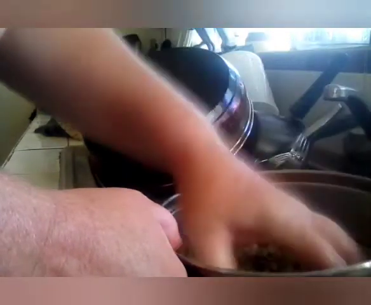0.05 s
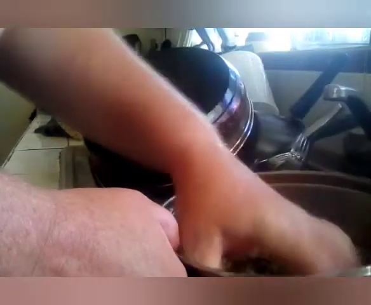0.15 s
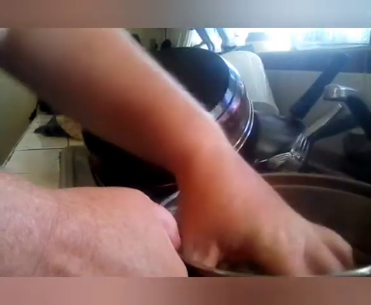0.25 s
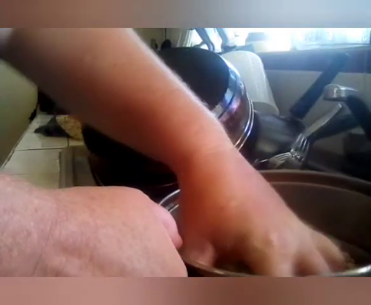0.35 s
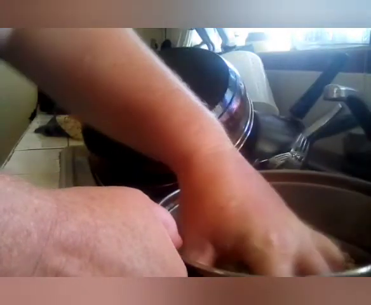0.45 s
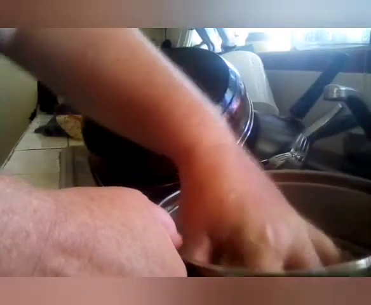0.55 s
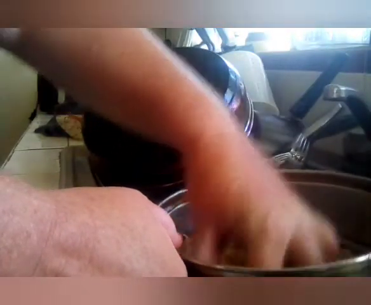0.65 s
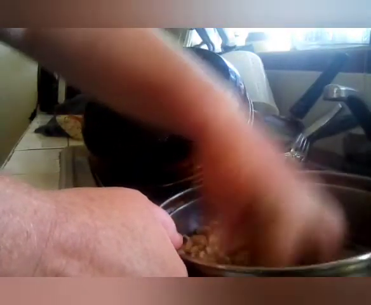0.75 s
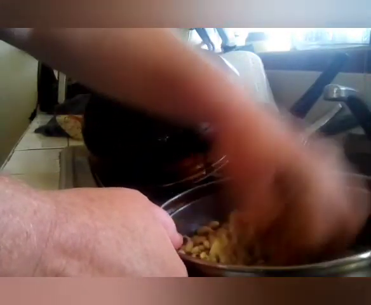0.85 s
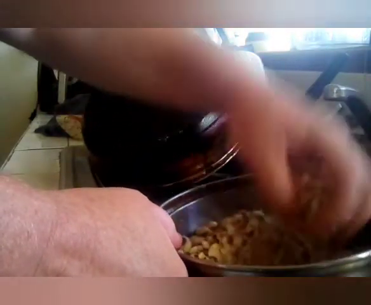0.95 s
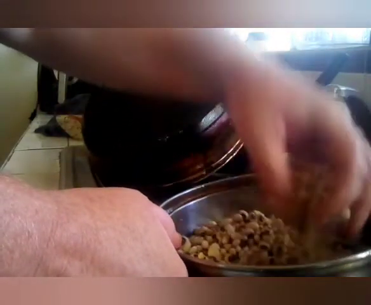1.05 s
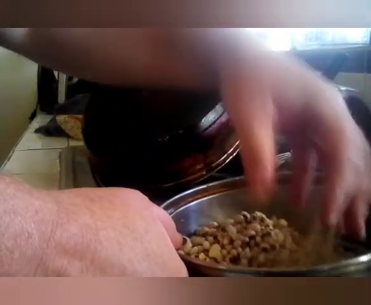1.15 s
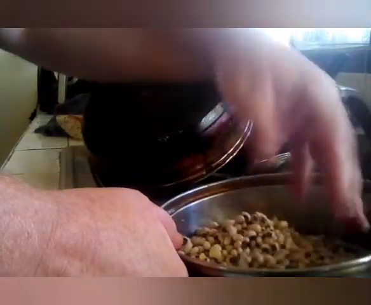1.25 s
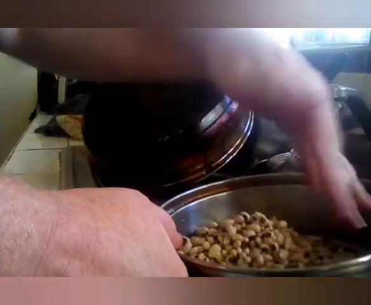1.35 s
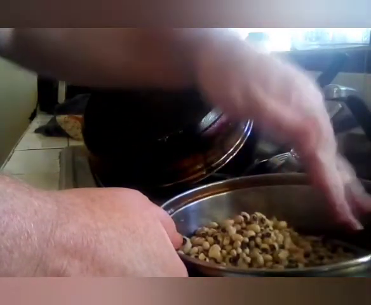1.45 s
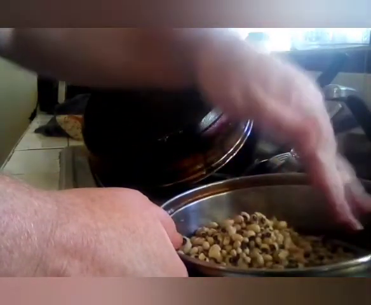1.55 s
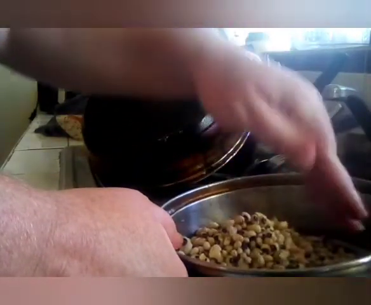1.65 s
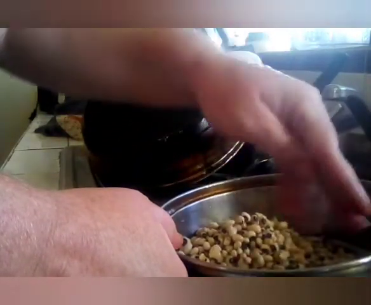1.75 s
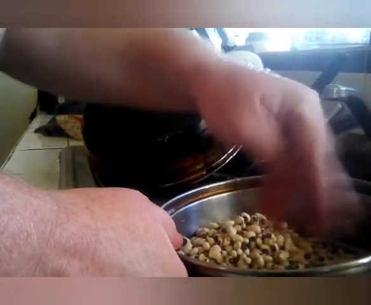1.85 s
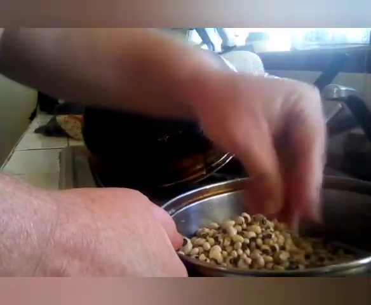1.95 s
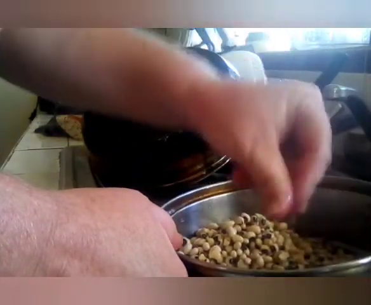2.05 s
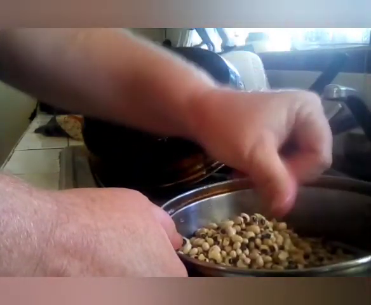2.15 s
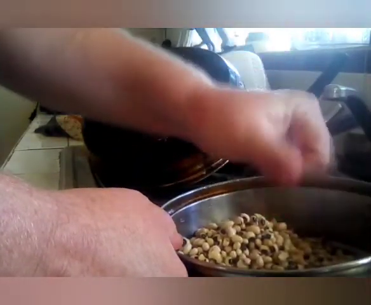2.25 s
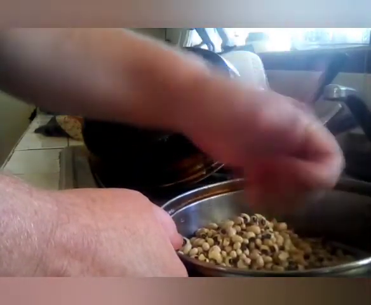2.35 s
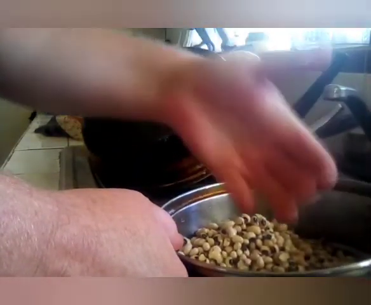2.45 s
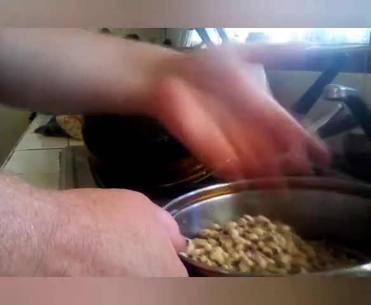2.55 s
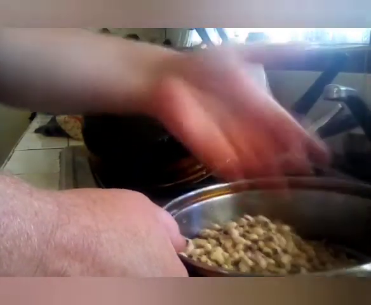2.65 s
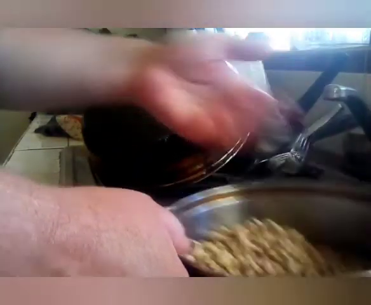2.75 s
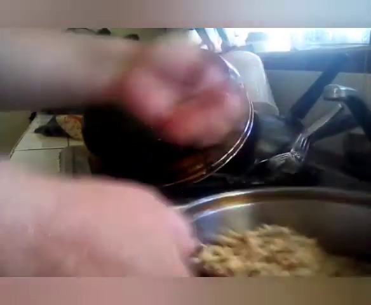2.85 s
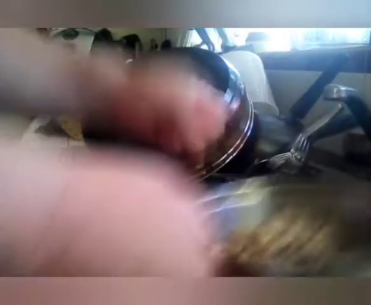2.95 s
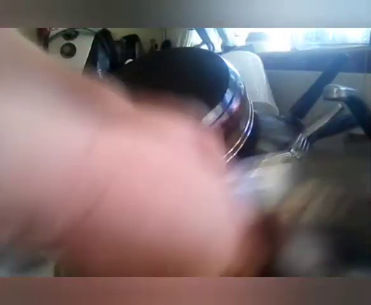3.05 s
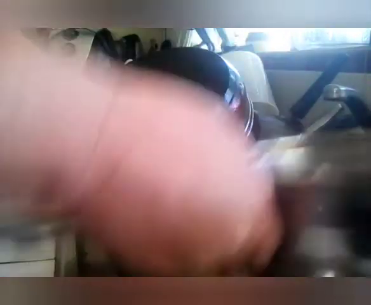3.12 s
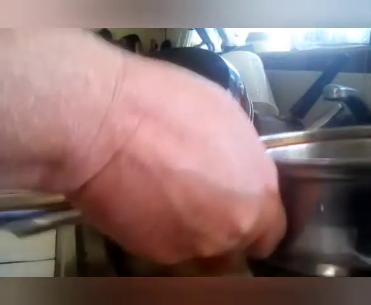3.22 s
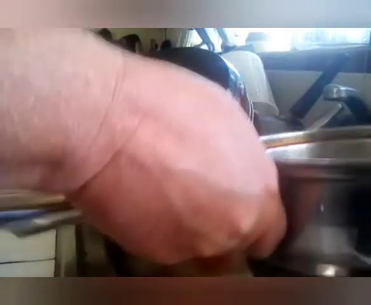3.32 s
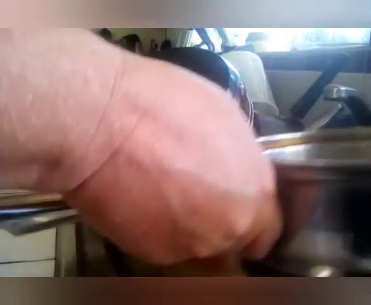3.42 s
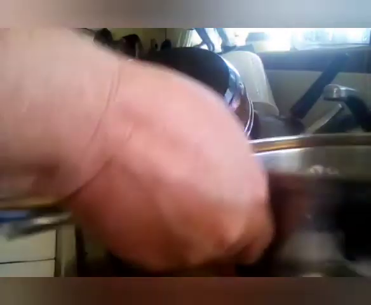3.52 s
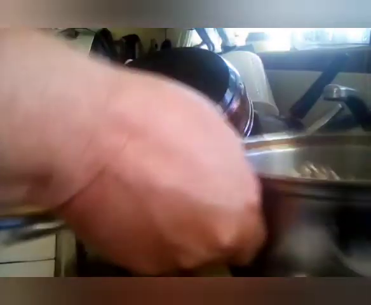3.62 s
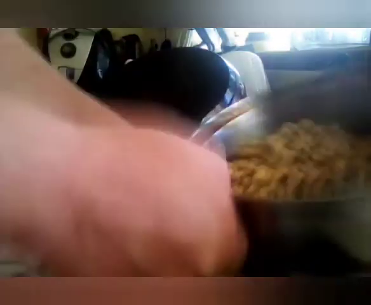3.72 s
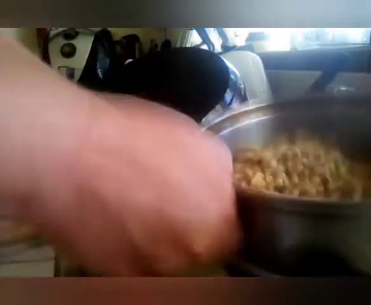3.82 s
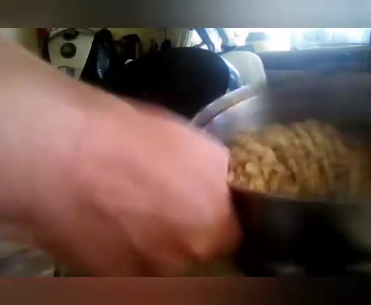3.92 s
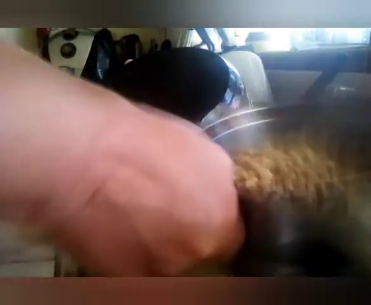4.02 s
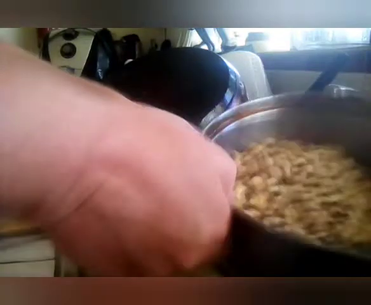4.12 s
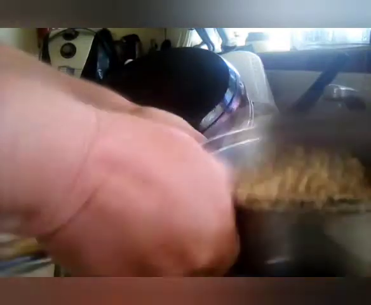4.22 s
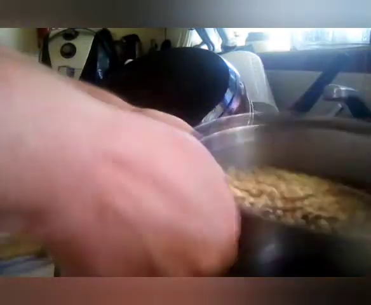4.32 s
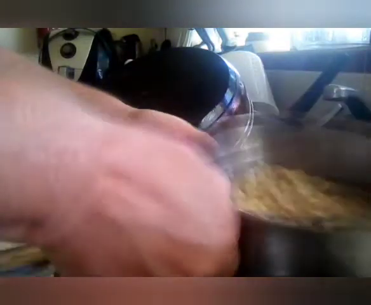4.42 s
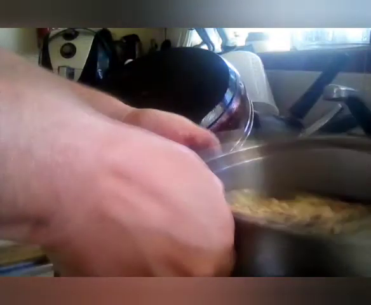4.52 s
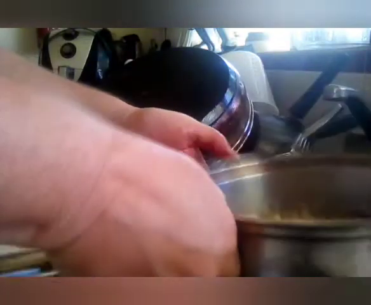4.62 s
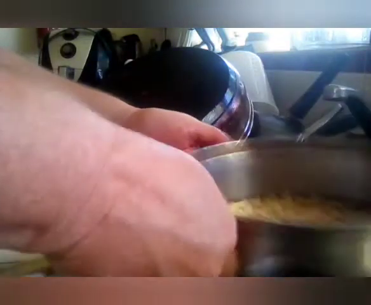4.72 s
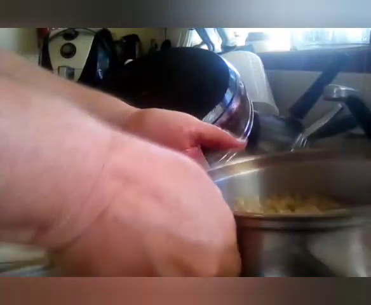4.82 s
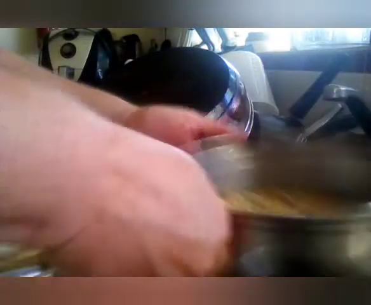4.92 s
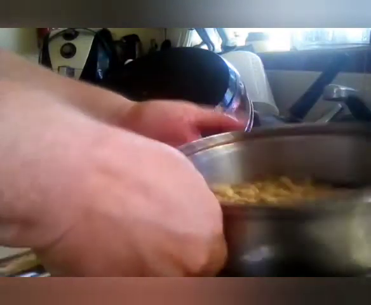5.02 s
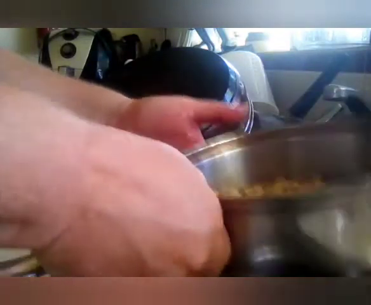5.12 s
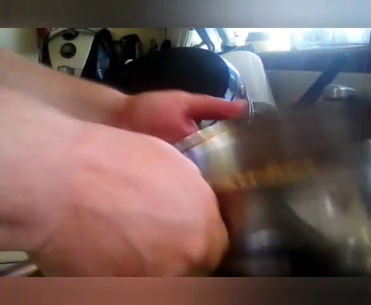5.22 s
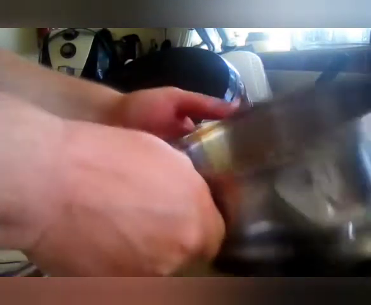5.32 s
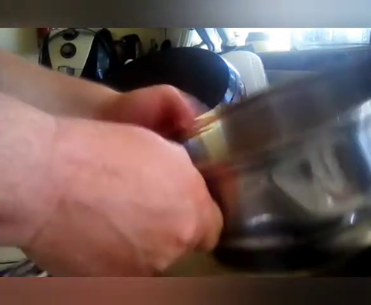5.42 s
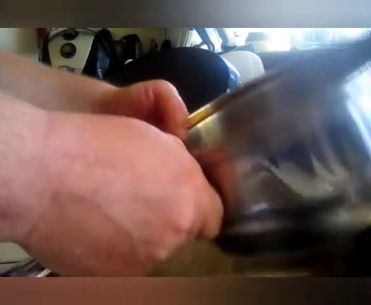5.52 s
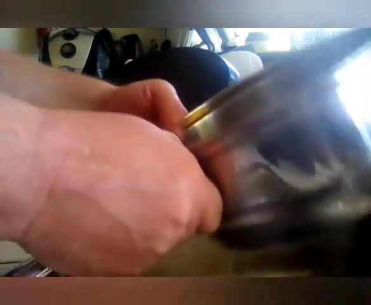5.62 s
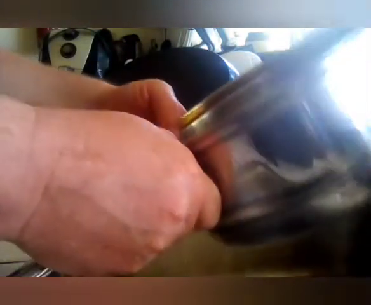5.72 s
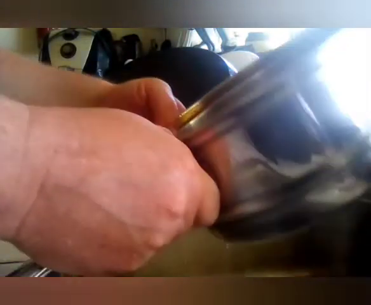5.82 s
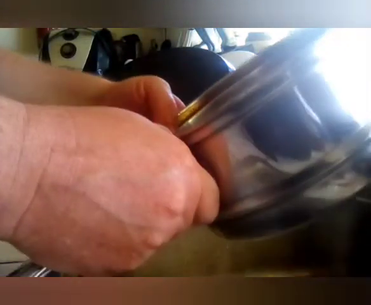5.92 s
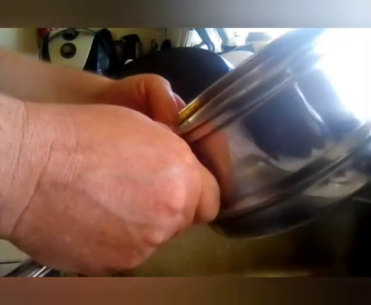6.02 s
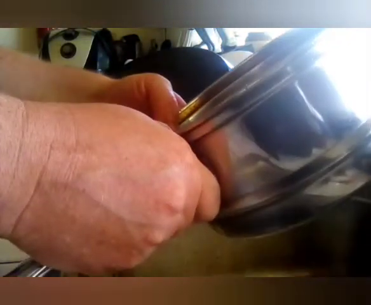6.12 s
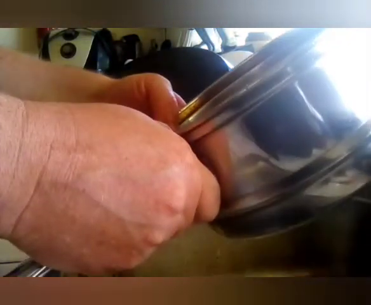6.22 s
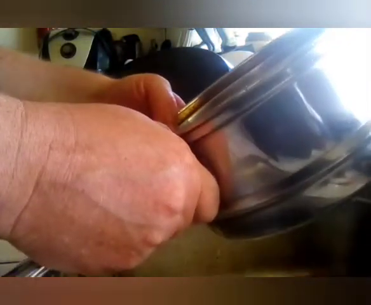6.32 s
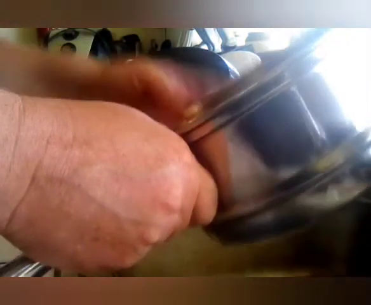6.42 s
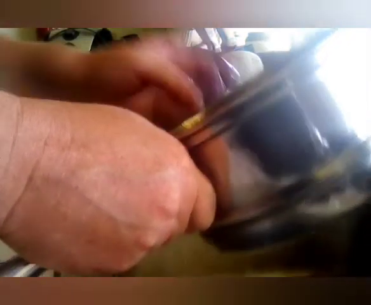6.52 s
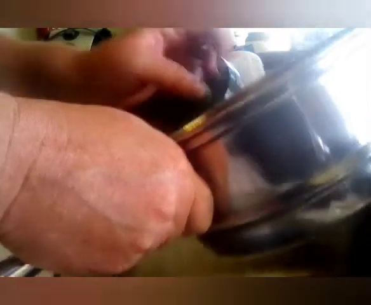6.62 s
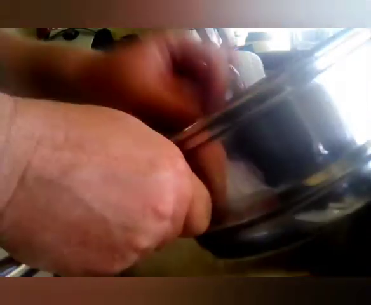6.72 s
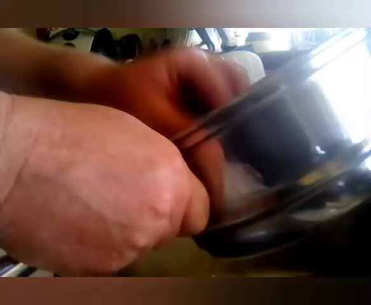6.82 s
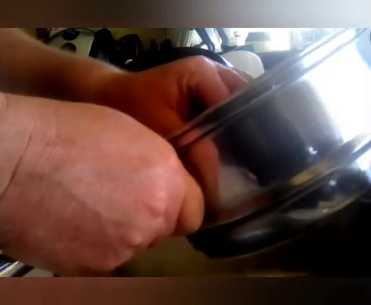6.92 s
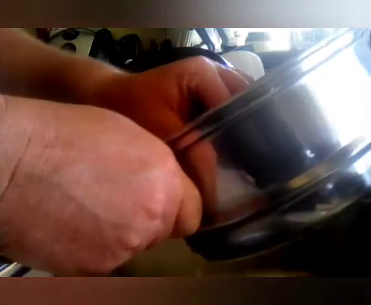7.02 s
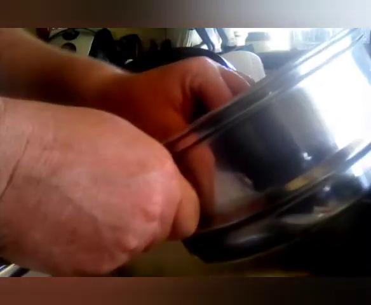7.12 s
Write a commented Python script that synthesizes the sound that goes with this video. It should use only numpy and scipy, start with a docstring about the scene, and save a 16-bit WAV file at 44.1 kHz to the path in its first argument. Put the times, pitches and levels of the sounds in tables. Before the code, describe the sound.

Wet beans are stirred by hand in a steel strainer, patter back dully, then clatter in bright tosses before slow drips knock a sink basin.

```python
"""Wet beans are stirred by hand in a steel strainer over a kitchen sink; a handful falls back with a dull patter.
The strainer is lifted and tossed so that the beans clatter on its wall, then tilted to drain:
drops knock on the basin while a dull wash of noise swells in the small room.
Every movement of the heap swells, holds and settles, and drives a stream of random bean contacts;
each contact excites a short crack of noise and the decaying resonances of the steel it meets."""
import sys
import numpy as np
from scipy import signal
from scipy.fft import rfft, irfft
from scipy.io import wavfile

SR = 44100
rng = np.random.default_rng(int(sys.argv[2]) if len(sys.argv) > 2 else 0)


def master_out(mix):
    """Clip the mix to full scale and print it as 16-bit PCM to the path in sys.argv[1]."""
    frames = np.transpose(np.atleast_2d(mix))
    ceiling = np.clip(frames, -1, 1)
    pcm = np.round(ceiling * 32767).astype(np.int16)
    wavfile.write(sys.argv[1], SR, pcm)


N = 316152
TIME = np.arange(N) / SR

# Dull contacts on the strainer bottom. Each row: frequency in Hz, relative level in dB.
THUD_SPECTRUM = [(30, -40.5), (100, -50), (200, -15.5), (330, 1), (430, -4), (700, 6), (1150, 1), (1550, 3),
                 (1800, -2.5), (2400, -5.5), (5000, -52)]
# Soft blows passed on to the sink. Each row: frequency in Hz, relative level in dB.
SINK_SPECTRUM = [(30, -43), (70, -39), (200, -11), (330, -5), (420, -4.5), (700, 0), (1000, 10.5),
                 (1400, -11.5), (1650, -8.5), (1950, -18.5), (2500, -17), (3200, -36), (8000, -100)]
# A touch on the rim. Each row: frequency in Hz, relative level in dB.
RIM_SPECTRUM = [(1500, -23), (2100, -18), (2450, 7), (2750, 0), (3200, -5), (4200, -10), (8000, -44)]
# Resonances of the rim. Each row: frequency in Hz, width in Hz, relative level in dB.
RIM_MODES = [(2450, 90, 1), (2320, 70, 0), (2720, 110, -3)]
# Resonances of the bare strainer. Each row: frequency in Hz, width in Hz, relative level in dB.
STRAINER_MODES = [(1910, 82, -5), (2240, 35, -3), (2910, 36, 5), (3320, 70, 0), (3870, 50, 7.5),
                  (4310, 60, -2), (4803, 32, 5), (5010, 34, 6.5), (5735, 48, 3), (6505, 38, 6),
                  (6820, 81, -4), (7600, 45, -14), (9000, 300, -16)]
# The bottom loaded with beans. Each row: frequency in Hz, width in Hz, relative level in dB.
LOADED_BOTTOM_MODES = [(308, 42, -13.5), (727, 24, 0), (1140, 98, -3.5), (1390, 8.3, -17), (1457, 68, -0.5)]
# The bottom pressed by the hand. Each row: frequency in Hz, width in Hz, relative level in dB.
PRESSED_BOTTOM_MODES = [(316, 20, -4), (345, 14, 3.5), (590, 18, -4), (706, 80, -1.5), (880, 60, 1.5),
                        (976, 28, -2.5), (1075, 52, 2.5), (1210, 90, -7.5), (1357, 55, 2), (1493, 36, -5.5)]


def from_db(db):
    """Decibels to gain."""
    return 10 ** (np.asarray(db) / 20)


def unit_energy(x):
    """Scale so that the squares sum to one."""
    return x / np.sqrt(np.sum(x ** 2) + 1e-20)


def add(out, s, sound):
    """Mix a sound in from time s on."""
    start = int(np.clip(round(s * SR), 0, N - 1))
    out[start:start + len(sound)] += sound[:N - start]


def colour(x, spectrum):
    """Causal (minimum-phase) filter of unit energy that follows the shape of a spectrum."""
    size = 4096
    hz, db = np.transpose(spectrum)
    grid = np.maximum(np.fft.rfftfreq(size, 1 / SR), 1)
    level_db = np.interp(np.log(grid), np.log(hz), db)
    # folding the cepstrum onto positive times gives the minimum phase
    cepstrum = irfft(np.log(from_db(level_db)))
    cepstrum[1:size // 2] *= 2
    cepstrum[size // 2 + 1:] = 0
    response = unit_energy(irfft(np.exp(rfft(cepstrum))))
    return signal.oaconvolve(x, response)[:len(x)]


def soften(x, hz):
    """A soft contact lasts longer and so carries no treble: a low-pass at hz."""
    return signal.sosfilt(signal.butter(4, hz, fs=SR, output="sos"), x)


def waver(rate):
    """Slow random wander of spread about one, without wild excursions; rate in changes per second."""
    knots = signal.resample_poly(rng.standard_normal(400), 8, 1)
    wander = np.interp(TIME * rate * 8, np.arange(len(knots)), knots)
    return 2 * np.tanh(wander / 1.6)


def swells(starts, holds, levels_db, rise, fall):
    """Gain of a series of movements: each rises to its level, holds and settles, at rates in dB per second."""
    power = np.zeros(N)
    for s, hold, db in zip(starts, holds, levels_db):
        near = slice(*np.searchsorted(TIME, [s - .5, s + 1]))
        below_db = np.maximum(rise * (s - TIME[near]), fall * (TIME[near] - s - hold))
        power[near] += from_db(db - np.maximum(below_db, 0)) ** 2
    return np.sqrt(power)


def contacts(per_s, spread_db):
    """Random contacts of rms 1; a positive spread makes a few large ones, a negative spread a few small ones."""
    at = np.flatnonzero(rng.random(N) < per_s / SR)
    sizes = rng.laplace(0, 1, N)[at]
    out = np.zeros(N)
    out[at] = np.sign(sizes) * from_db(spread_db * np.minimum(abs(sizes), 3))
    return np.sqrt(N) * unit_energy(out)


def volleys(times, levels_db, scatter, lead_db, count=12):
    """At each time one leading contact, then others straggling behind it by scatter seconds on average."""
    clicks = np.zeros(N)
    for s, db in zip(times, levels_db):
        delay = -scatter * np.log(1 - (np.arange(count) + rng.random(count)) / count)
        sizes = from_db(rng.normal(0, 3.5, count)) * rng.choice([-1, 1], count)
        delay[0], sizes[0] = 0, from_db(lead_db)
        at = np.clip(((s + delay) * SR).astype(int), 0, N - 1)
        np.add.at(clicks, at, from_db(db) * unit_energy(sizes))
    return clicks


def ringing(modes, uneven_db):
    """Decaying sines set off by one tap; their strengths and exact pitches depend on where it lands."""
    detune = .003  # share of the pitch: the shifting load detunes the steel from one blow to the next
    t = TIME[:SR // 4]
    hz, width, db = np.transpose(modes)[:, :, None]
    hz = hz * (1 + detune * rng.standard_normal(hz.shape))
    strength = width * from_db(db + uneven_db * rng.standard_normal(db.shape))
    strength = strength * rng.choice([-1, 1], db.shape)
    sines = np.exp(-np.pi * width * t) * np.sin(2 * np.pi * hz * t)
    return unit_energy(np.sum(strength * sines, axis=0))


def noise_crack(spectrum, t60):
    """A short dense burst of decaying noise; t60 in seconds, unit energy."""
    t = TIME[:SR // 4]
    return unit_energy(colour(rng.standard_normal(len(t)) * from_db(-60 * t / t60), spectrum))


def strike(clicks, spectrum, modes, ring_db, crack_t60, spot_db, count=8):
    """Clicks land on several spots of a body, each with its own short crack and its own mix of the modes."""
    out = np.zeros(N)
    first, last = np.flatnonzero(clicks)[[0, -1]]
    spot = rng.integers(0, count, N)
    for k in range(count):
        tint_db = spot_db * rng.standard_normal(len(spectrum))
        crack = noise_crack(np.array(spectrum) + np.outer(tint_db, [0, 1]), crack_t60)
        response = unit_energy(crack + from_db(ring_db) * ringing(modes, spot_db))
        here = (clicks * (spot == k))[first:last + 1]
        add(out, first / SR, signal.fftconvolve(here, response))
    return out


def wall_hit(taps, pitch, spectrum, modes, ring_db, crack_t60, focus_db, focus_octaves):
    """A hit on one spot of the wall, which stresses a band around its own pitch; unit energy."""
    size = SR // 4
    response = noise_crack(spectrum, crack_t60) + from_db(ring_db) * ringing(modes, uneven_db=7.5)
    hit = signal.fftconvolve(taps[:size], response)[:size]
    grid = np.geomspace(800, 16000, 64)
    focus = focus_db * np.exp(-.5 * (np.log2(grid / pitch) / focus_octaves) ** 2)
    return unit_energy(colour(hit, np.column_stack([grid, focus])))


def pings(times, levels_db, pitches, t60, rise):
    """The struck spot rings briefly at a pitch of its own; t60 and rise in seconds."""
    t, out = TIME[:SR // 3], np.zeros(N)
    envelope = (1 - np.exp(-t / rise)) * from_db(-60 * t / t60)
    for s, db, hz in zip(times, levels_db, pitches):
        add(out, s, from_db(db) * envelope * np.sin(2 * np.pi * hz * t))
    return out


def hollows(tones, waver_db, wander):
    """Narrow bands of noise, each wandering in level and pitch on its own."""
    out = np.zeros(N)
    for hz, width, db in tones:
        band = signal.lfilter(*signal.iirpeak(hz, hz / width, fs=SR), rng.standard_normal(N))
        band = np.sqrt(N) * unit_energy(band)
        # reading the band at an uneven speed bends its pitch
        position = np.cumsum(1 + wander * waver(rate=6))
        band = np.interp(position, np.arange(N), band, right=0)
        out += band * from_db(db + waver_db * waver(rate=9))
    return out


def basin_modes():
    """The resonances of the steel basin, none narrower than 16 Hz, so that none rings on for long."""
    # Each row: frequency in Hz, width in Hz (narrower ones are widened below), relative level in dB.
    basin = [(319, 3.4, -18), (340, 9.3, -0.5), (497, 9.8, -2.5), (563, 7.9, -1), (736.4, 10.2, 8),
             (887.5, 8.7, 2.5), (930, 18, -17), (997, 14, -18), (1060, 39, -3), (1340, 25, -10),
             (1538, 10, -6.5)]
    min_width_hz = 16
    return [(hz, max(width, min_width_hz), db) for hz, width, db in basin]


def stirring():
    """The hand pushes through the heap: single beans snap on the wall, thuds pass down into the sink."""
    # The hand pushes. Each row: start in seconds, hold in seconds, click and thud relative levels in dB.
    pushes = [(0, 0.025, -49.5, -49), (0.138, 0.066, -49.5, -42), (0.304, 0.038, -54.5, -41),
              (0.424, 0.027, -43.5, -39), (0.49, 0.033, -49, -40), (0.592, 0.081, -61.5, -48.5),
              (0.753, 0.057, -60, -48.5)]
    # Single beans snap on the wall; the last row is the strainer leaving the basin.
    # Each row: start in seconds, click and thud relative levels in dB, pitch of the struck spot in Hz.
    flicks = [(0.0382, -38.5, -64, 3850), (0.135, -45, -42, 2440), (0.156, -39, -44, 6400),
              (0.1686, -28.5, -61, 8600), (0.1709, -28.5, -55, 2700), (0.2015, -35, -44, 4030),
              (0.2074, -28.5, -35, 4180), (0.238, -36, -43, 3300), (0.2891, -38.5, -40, 4830),
              (0.327, -29, -32.5, 5300), (0.331, -30, -49, 2480), (0.3694, -37, -46, 2430),
              (0.3902, -29, -41, 3770), (0.4086, -20, -38, 3700), (0.4308, -40, -35, 3820),
              (0.445, -31.5, -43, 5860), (0.456, -34, -35, 8400), (0.467, -34, -38, 4200),
              (0.514, -27, -37, 3700), (0.533, -37, -36, 2680), (0.638, -40, -37, 3860),
              (0.7609, -38.5, -44, 3060), (0.8048, -31.5, -44, 3100), (2.708, -53.5, -48, 3020)]
    # Wet hand and bowl rub softly in the sink. Each row: start and hold in seconds, relative level in dB.
    rubs = [(1.44, 0.033, -48), (1.59, 0.076, -55), (1.876, 0.12, -57), (2.208, 0.03, -52.5),
            (2.427, 0.02, -55.5), (2.706, 0.016, -48.5), (2.949, 0.019, -55), (3.396, 0.03, -59.5),
            (5.683, 0.034, -48), (6.755, 0.018, -64)]
    # Beans driven against the wall. Each row: frequency in Hz, relative level in dB.
    stir_spectrum = [(1000, -17), (1700, -21), (1930, 3), (2100, -17), (2420, 3.5), (3370, -6), (3770, 1),
                     (4620, -5.5), (6740, -6.5), (7500, -16.5), (9150, -18), (10500, -33), (12100, -64),
                     (15500, -89)]
    # The wall, damped by the hand. Each row: frequency in Hz, width in Hz, relative level in dB.
    pressed_wall = [(1890, 38, -8), (2430, 45, -3), (2680, 120, -14), (2960, 17, 14), (3300, 240, -7),
                    (3840, 110, 0.5), (4400, 89, 7), (5000, 99, -6), (5500, 150, -2), (6680, 62, -9.5),
                    (6570, 110, -15.5)]
    rise, click_fall, thud_fall = 369, 218, 87  # dB per second
    scatter = .003  # seconds the stragglers trail

    s, hold, click_db, thud_db = np.transpose(pushes)
    click = swells(s, hold, click_db, rise, click_fall)
    thud = swells(s, hold, thud_db, rise, thud_fall)
    grains = from_db(-2.5) * click * contacts(per_s=1100, spread_db=1.0)
    wall = strike(grains, stir_spectrum, pressed_wall, ring_db=-1.5, crack_t60=0.031, spot_db=3.0)
    for s, db, _, hz in flicks:
        taps = volleys([0], [0], scatter, lead_db=16)
        snap = wall_hit(taps, hz, stir_spectrum, pressed_wall, ring_db=-5.5, crack_t60=0.028,
                        focus_db=8, focus_octaves=0.11)
        add(wall, s, from_db(db + 13.0) * snap)

    s, _, thud_db, _ = np.transpose(flicks)
    dull = from_db(19.0) * volleys(s, thud_db, scatter, lead_db=7.0)
    dull += from_db(-5.5) * thud * contacts(per_s=690, spread_db=3.5)
    bottom = strike(dull, THUD_SPECTRUM, PRESSED_BOTTOM_MODES, ring_db=4.5, crack_t60=0.022, spot_db=2.5)
    rub = swells(*np.transpose(rubs), rise=354, fall=156) * contacts(per_s=1500, spread_db=4.0)
    into_sink = from_db(-3.0) * dull + rub
    sink = strike(into_sink, SINK_SPECTRUM, basin_modes(), ring_db=2.5, crack_t60=0.032, spot_db=3.5)
    return wall + bottom + sink


def spatter():
    """A last spatter of rinse water: fine drops hiss on the beans and die away at the start."""
    # Each row: frequency in Hz, relative level in dB.
    spatter_spectrum = [(1500, -2), (3500, -6), (6500, 1), (9500, -6.5), (12000, -26), (15500, -27)]
    level_db = -46 - 231 * np.minimum(TIME, 1)  # falls by 231 dB per second
    return from_db(level_db) * colour(contacts(per_s=1900, spread_db=-20.0), spatter_spectrum)


def room_air():
    """Steady room noise at a slightly unsteady level, with a few hollow tones made of narrow noise bands."""
    # Each row: frequency in Hz, relative level in dB.
    room_spectrum = [(25, -31), (70, 1.5), (130, -1.5), (200, -1.5), (300, 1), (430, -15), (640, -19.5),
                     (1100, -4.5), (1600, -19), (2200, -23.5), (4000, -26.5), (5600, -30), (6250, -17.5),
                     (7000, -39.5), (7520, -29.5), (8200, -48), (13500, -44), (15500, -36)]
    # Hollow tones of the room. Each row: frequency in Hz, width in Hz, level in dB.
    room_tones = [(263, 16, -67.5), (323, 12, -61.5), (520, 13, -64.5), (632, 25, -74), (1040, 70, -68)]
    level_db = -62.5 + 1.0 * waver(rate=9.6)
    air = from_db(level_db) * colour(rng.standard_normal(N), room_spectrum)
    return air + hollows(room_tones, waver_db=2.5, wander=.008)


def handling_rumble():
    """Low noise of the handled bowl at an unsteady level, louder once the full strainer is held tilted."""
    # Each row: frequency in Hz, relative level in dB.
    rumble_spectrum = [(25, -54), (45, -8.5), (68, -1.5), (100, -1.5), (135, -5.5), (170, -1), (260, -13),
                       (700, -76)]
    tilt_s, tilt_takes_s, upright_db, tilted_db = 5.5, 0.054, -64.5, -56.5
    level_db = np.interp(TIME, [tilt_s, tilt_s + tilt_takes_s], [upright_db, tilted_db])
    level_db = level_db + 3.4 * waver(rate=16)
    return from_db(level_db) * colour(rng.standard_normal(N), rumble_spectrum)


def counter_bumps():
    """The hand bumps the bowl against the counter, which booms low with a soft onset."""
    # Each row: start in seconds, relative level in dB, pitch in Hz.
    bumps = [(0.172, -45, 101), (0.211, -43, 99), (0.333, -45, 99), (0.444, -44.5, 98), (0.494, -52, 92),
             (0.647, -51.5, 88), (0.81, -49, 102), (0.943, -53, 99), (1.27, -66, 79), (1.438, -51.5, 95),
             (2.73, -49.5, 95), (3.336, -57, 94), (5.6, -55, 99.4), (6.05, -44, 107), (6.401, -49.5, 158),
             (6.54, -48, 94), (6.7, -49, 91), (6.894, -47.5, 103), (6.999, -52, 103), (7.121, -50, 97)]
    return from_db(8.5) * pings(*np.transpose(bumps), t60=0.086, rise=0.0069)


def basin_knocks():
    """Dull knocks of falling beans and of the bowl in the sink set the steel basin ringing."""
    # Each row: start in seconds, relative level in dB, pitch of the struck spot in Hz.
    knocks = [(0.447, -30, 900), (0.568, -26.5, 1090), (0.696, -31, 800), (0.793, -33, 910),
              (0.851, -33.5, 713), (0.909, -35.5, 753), (0.949, -33.5, 1070), (0.99, -29, 727),
              (1.023, -28, 1130), (1.038, -26.5, 720), (1.06, -29.5, 747), (1.1194, -26.5, 1393),
              (1.142, -28, 1354), (1.412, -36, 945), (2.207, -40, 1060), (2.707, -31.5, 1026),
              (2.945, -43, 733)]
    s, db, hz = np.transpose(knocks)
    blows = from_db(17.0) * volleys(s, db, scatter=.006, lead_db=10.0)
    basin = strike(blows, SINK_SPECTRUM, basin_modes(), ring_db=0.5, crack_t60=0.046, spot_db=1.0)
    spots = from_db(-6.5) * pings(s, db, hz, t60=.055, rise=0.00029)
    return soften(basin + spots, hz=1790)


def rim_touches():
    """Fingers and stray beans touch the rim, which answers with its modes and a short pure ring."""
    # Each row: start in seconds, relative level in dB, pitch in Hz.
    touches = [(0.569, -42, 2480), (0.9074, -57, 2440), (0.99, -47, 2520), (1.024, -41, 2460),
               (1.0355, -48, 2700), (1.083, -62, 2680), (1.2, -52, 2360), (1.2243, -52, 2490),
               (2.22, -59, 2300), (2.706, -54.5, 2600), (2.951, -64, 2400), (3.3248, -58, 2430)]
    s, db, hz = np.transpose(touches)
    taps = from_db(16.0) * volleys(s, db, scatter=0.0024, lead_db=1, count=3)
    rim = strike(taps, RIM_SPECTRUM, RIM_MODES, ring_db=7, crack_t60=0.025, spot_db=4.0, count=4)
    return rim + pings(s, db, hz, t60=.04, rise=0.0006)


def falling():
    """Beans dropping on beans tick faintly, brush the rim and drum on the bottom."""
    # Beans drop from the opening hand: a few, two clumps, then stragglers. Each row: start in seconds,
    # hold in seconds, tick, rim and thud relative levels in dB.
    spills = [(0.92, 0.1, -69.5, -59, -56), (1.055, 0.02, -54, -43, -34), (1.108, 0.022, -47.5, -39.5, -35),
              (1.193, 0.076, -66, -84, -45)]
    # Bean on bean. Each row: frequency in Hz, relative level in dB.
    fall_spectrum = [(1200, -14), (1700, 9), (2200, -14), (3000, -2), (4000, 1), (5000, -0.5), (6500, 1),
                     (7800, -8), (9500, -11), (11000, -24), (13000, -43), (15500, -33)]
    # The bottom under falling beans. Each row: frequency in Hz, width in Hz, relative level in dB.
    fall_modes = [(346, 15, -1), (727, 130, -2.5), (890, 94, 1), (1060, 68, -12), (1332, 55, -5),
                  (1550, 36, -12)]
    rise, tick_fall, thud_fall = 448, 304, 261  # dB per second

    s, hold, tick_db, rim_db, thud_db = np.transpose(spills)
    drops = contacts(per_s=480, spread_db=3)
    tick = from_db(-3.0) * swells(s, hold, tick_db, rise, tick_fall) * drops
    rim = from_db(-12) * swells(s, hold, rim_db, rise, tick_fall) * drops
    thud = from_db(-5.5) * swells(s, hold, thud_db, rise, thud_fall) * drops
    ticks = strike(tick, fall_spectrum, STRAINER_MODES, ring_db=-17, crack_t60=0.042, spot_db=1.5, count=4)
    brush = strike(rim, RIM_SPECTRUM, RIM_MODES, ring_db=15, crack_t60=0.015, spot_db=6, count=4)
    drum = strike(thud, THUD_SPECTRUM, fall_modes, ring_db=20.0, crack_t60=0.019, spot_db=6.0)
    return ticks + brush + drum


def ticking():
    """Wet fingers make tiny high ticks on the steel, each a very short sine."""
    # Each row: start in seconds, relative level in dB, pitch in Hz.
    finger_ticks = [(1.447, -60, 8000), (3.346, -57, 9300), (3.356, -64, 8550), (5.97, -61.5, 8800)]
    return pings(*np.transpose(finger_ticks), t60=0.012, rise=.0005)


def swelling_wash():
    """A dull wash of noise swells slowly; its upper edge opens faster than its body, and hollow tones wander."""
    # Each row: time in seconds, level in dB.
    wash_levels = [(0, -100), (2.6, -65), (3.7, -59.5), (5.3, -57), (5.55, -54), (5.7, -52), (5.95, -51),
                   (6.3, -55), (6.6, -52.5), (6.85, -50), (7.15, -49)]
    # Body of the wash. Each row: frequency in Hz, relative level in dB.
    body_spectrum = [(150, -30.5), (280, 7), (420, -5), (550, 3), (700, -3), (830, -2.5), (980, 11),
                     (1150, 3.5), (1400, -1.5), (1550, 3.5), (1880, -2.5), (2200, -35), (4000, -72.5)]
    # Upper edge of the wash. Each row: frequency in Hz, relative level in dB.
    edge_spectrum = [(1000, -24.5), (1700, -1), (2100, 8), (2400, -4), (2800, -13), (4000, -48),
                     (8000, -53)]
    # Wandering tones. Each row: frequency in Hz, width in Hz, level in dB beside the wash.
    wash_tones = [(931, 15, -9.5), (1093, 17, -15.5), (1241, 16, -13.5), (1813, 40, -17)]
    edge_loudest_db, edge_follows = -59.5, 3.14  # edge_follows in dB per dB of the body

    level_db = np.interp(TIME, *np.transpose(wash_levels))
    edge_db = edge_loudest_db + edge_follows * (level_db - level_db.max())
    body_db = level_db - 1.0 + 1.7 * waver(rate=13)
    body = from_db(body_db) * colour(rng.standard_normal(N), body_spectrum)
    edge = from_db(edge_db + 2.2 * waver(rate=23)) * colour(rng.standard_normal(N), edge_spectrum)
    tones = from_db(level_db) * hollows(wash_tones, waver_db=3, wander=.02)
    return body + edge + tones


def lifting():
    """The strainer is knocked as it is lifted: the whole loaded bowl answers one abrupt blow."""
    # Each row: start in seconds, relative level in dB.
    lifts = [(2.708, -31)]
    # Body of the knock. Each row: frequency in Hz, relative level in dB.
    lift_spectrum = [(150, -19), (330, 6), (500, 7), (700, -6), (900, -6), (1300, -12), (1550, -6.5),
                     (1900, -14.5), (5000, -57)]
    s, db = np.transpose(lifts)
    blow = from_db(16) * volleys(s, db, scatter=0.005, lead_db=10)
    return strike(blow, lift_spectrum, PRESSED_BOTTOM_MODES, ring_db=-8, crack_t60=0.051, spot_db=1.0, count=2)


def slapping():
    """In the first two tosses clumps of the heap slap the bottom as one mass, with a hollow knock."""
    # Each row: start in seconds, relative level in dB.
    slaps = [(3.769, -43), (3.779, -38), (3.789, -29), (3.7995, -24), (3.809, -34), (4.0, -25.5),
             (4.007, -24)]
    # Each row: frequency in Hz, relative level in dB.
    slap_spectrum = [(300, -9.5), (700, -12), (950, -3), (1150, -2), (1550, 2), (1720, -13.5), (2900, -16),
                     (4300, -21), (6000, -29), (10000, -58)]
    s, db = np.transpose(slaps)
    blows = from_db(14.5) * volleys(s, db, scatter=.005, lead_db=14)
    return strike(blows, slap_spectrum, LOADED_BOTTOM_MODES, ring_db=-14.5, crack_t60=0.052, spot_db=0.0, count=5)


def tossing():
    """The heap slides and lands: the bare wall rings high, the loaded bottom answers low."""
    # The heap slides across. Each row: start and hold in seconds, click and thud relative levels in dB.
    tosses = [(3.809, 0.006, -48, -86), (4.002, 0.0061, -54, -44.5), (4.168, 0.059, -46.5, -42),
              (4.274, 0.024, -37, -43), (4.405, 0.05, -31.5, -35), (4.502, 0.046, -34, -36),
              (4.595, 0.045, -36.5, -41), (4.731, 0.042, -33.5, -37), (4.82, 0.031, -34.5, -40),
              (4.921, 0.045, -40.5, -40), (4.993, 0.012, -51, -47)]
    # Tossed beans land on the steel. Each row: start in seconds, click, thud and hard snap relative levels
    # in dB, pitch of the struck spot in Hz, trail of the stragglers in seconds.
    landings = [(3.8005, -35.5, -33.5, -58, 2630, .005), (3.8214, -33, -50, -56, 2970, 0.0033),
                (3.8282, -42, -60, -60, 2850, 0.0056), (3.999, -27.5, -36, -24, 3890, 0.0065),
                (4.1985, -39.5, -37.5, -58, 3800, 0.0044), (4.2275, -35.5, -52, -58, 4930, 0.0042),
                (4.274, -26.5, -30.5, -23, 5220, 0.0057), (4.2815, -19.5, -50, -14, 3440, .003),
                (4.3314, -25, -36, -17.5, 3320, .0015), (4.36, -36, -42, -40, 3850, 0.0048),
                (4.4016, -22.5, -41.5, -21.5, 6660, 0.0035), (4.4278, -26, -30.5, -15, 3820, 0.006),
                (4.439, -15.5, -28, -6, 3950, 0.0058), (4.458, -34.5, -35.5, -27, 3300, 0.0043),
                (4.4833, -23, -48, -21.5, 3700, 0.0055), (4.5199, -26, -29, -19, 3810, 0.0035),
                (4.541, -19.5, -30, -17, 5620, 0.0052), (4.5805, -28, -45, -12.5, 4900, 0.0038),
                (4.5954, -20.5, -31, -14, 3970, 0.0014), (4.606, -21.5, -33, -25.5, 5000, 0.0046),
                (4.6365, -24, -27.5, -18, 3900, 0.0041), (4.704, -37.5, -34, -50, 3400, 0.0054),
                (4.723, -31, -32.5, -40.5, 3630, 0.0019), (4.7385, -25, -46, -12.5, 3890, 0.0045),
                (4.7515, -20, -32.5, -28, 3600, 0.0033), (4.7622, -31, -49, -27.5, 3430, .004),
                (4.777, -28, -37, -34, 4910, 0.0033), (4.8161, -21.5, -34.5, -21.5, 3900, 0.0045),
                (4.829, -18.5, -32, -8, 5000, 0.0029), (4.8373, -15.5, -37.5, -9.5, 6240, .002),
                (4.8451, -18, -28.5, -15.5, 5000, 0.0049), (4.9335, -47, -31, -60, 3950, .005),
                (4.9429, -34, -32, -55, 3300, 0.0094), (4.99, -28.5, -34, -49, 3180, .005),
                (5.005, -35, -55, -55, 5000, .003)]
    # Beans on the bare wall. Each row: frequency in Hz, relative level in dB.
    toss_spectrum = [(1000, -50.5), (1700, -14.5), (2000, -6), (2600, 0.5), (3600, 6.5), (4570, 2),
                     (5400, 4.5), (6800, -0.5), (7900, -15.5), (9100, -1), (10500, -22.5), (12000, -46),
                     (15500, -62.5)]
    # Snap of a hard landing. Each row: frequency in Hz, relative level in dB.
    hard_spectrum = [(3000, -8), (6500, 6.5), (9000, 2.5), (11000, -7.5), (13000, -22), (15500, -18)]
    rise, click_fall, thud_fall = 697, 287, 227  # dB per second

    s, hold, click_db, thud_db = np.transpose(tosses)
    click = swells(s, hold, click_db, rise, click_fall)
    thud = swells(s, hold, thud_db, rise, thud_fall)
    slide = from_db(-5.0) * click * contacts(per_s=1400, spread_db=1.0)
    wall = strike(slide, toss_spectrum, STRAINER_MODES, ring_db=-2.5, crack_t60=0.025, spot_db=10.0)
    wall = soften(wall, hz=8230)
    for s, db, _, snap_db, hz, trail in landings:
        taps = volleys([0], [0], trail, lead_db=11.5)
        clatter = wall_hit(taps, hz, toss_spectrum, STRAINER_MODES, ring_db=-6.0, crack_t60=0.042,
                           focus_db=2.5, focus_octaves=0.215)
        add(wall, s, from_db(db + 13.5) * clatter)
        # only the hardest, shortest contacts reach the top treble
        snap = wall_hit(taps, hz, hard_spectrum, STRAINER_MODES, ring_db=-19.5, crack_t60=0.01,
                        focus_db=4, focus_octaves=1)
        add(wall, s, from_db(snap_db) * snap)

    s, click_db, thud_db, _, hz, _ = np.transpose(landings)
    dull = from_db(19.5) * volleys(s, thud_db, scatter=0.0045, lead_db=5)
    dull += from_db(-3.0) * thud * contacts(per_s=1400, spread_db=0.0)
    bottom = strike(dull, THUD_SPECTRUM, LOADED_BOTTOM_MODES, ring_db=-4.0, crack_t60=0.037, spot_db=3.0)
    spots = from_db(-10.5) * pings(s, click_db, hz, t60=0.039, rise=0.00029)
    return wall + spots + bottom


def dripping():
    """Rinse water drips from the strainer: each drop knocks on the basin and its splash follows at once."""
    # Each row: start in seconds, relative level in dB.
    drips = [(5.162, -33.5), (5.585, -29.5), (5.893, -40), (6.006, -28.5), (6.24, -32), (6.285, -31.5),
             (6.49, -30), (6.717, -34.5), (6.9, -36), (7.124, -30.5)]
    # A drop on the basin. Each row: frequency in Hz, relative level in dB.
    drip_spectrum = [(100, -33), (330, -20), (420, -25), (545, 9.5), (680, -1.5), (780, -0.5), (950, 12),
                     (1080, 5.5), (1220, -18), (1350, 5), (1550, -14), (1750, -22), (2400, -30),
                     (3200, -44), (8000, -79)]
    splash_after_s, splash_db, scatter = .011, -1.5, .003  # splash level beside its drop, scatter in seconds
    s, db = np.transpose(drips)
    drops = volleys(s, db, scatter, lead_db=13, count=6)
    splashes = volleys(s + splash_after_s, db + splash_db, scatter, lead_db=4, count=6)
    blows = from_db(17.5) * (drops + splashes)
    return strike(blows, drip_spectrum, basin_modes(), ring_db=-8, crack_t60=.04, spot_db=1)


def kitchen(x, t60, wet_db):
    """Dense reflections from close tiled walls, duller than the direct sound: a decaying noise tail."""
    t = TIME[:SR // 2]
    tail = rng.standard_normal(len(t)) * from_db(-60 * t / t60) * (t > .004)
    tail = unit_energy(colour(tail, [(100, 6.5), (1000, -3.5), (6000, -9), (15000, -5.0)]))
    return x + from_db(wet_db) * signal.oaconvolve(x, tail)[:N]


def scene():
    """Beans, strainer and sink sound in the kitchen; background noise and spatter arrive without reflections."""
    beans = stirring() + falling() + slapping() + tossing()
    touches = counter_bumps() + basin_knocks() + rim_touches() + ticking()
    in_room = kitchen(beans + touches + lifting() + dripping(), t60=0.31, wet_db=-7.5)
    background = room_air() + handling_rumble() + swelling_wash()
    return (in_room + background + spatter())[None]


def record(dry):
    """The deepest bass and the top are cut; the ends fade over a few milliseconds."""
    cutoff_hz = 15800
    fade = np.clip(np.minimum(TIME / .001, (TIME[-1] - TIME) / .004), 0, 1)
    thinned = signal.sosfilt(signal.butter(3, 42, "high", fs=SR, output="sos"), dry)
    return signal.sosfilt(signal.ellip(10, .2, 70, cutoff_hz, fs=SR, output="sos"), thinned * fade)


dry = scene()
out = record(dry)
master_out(out)
```